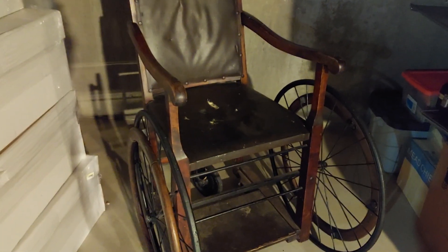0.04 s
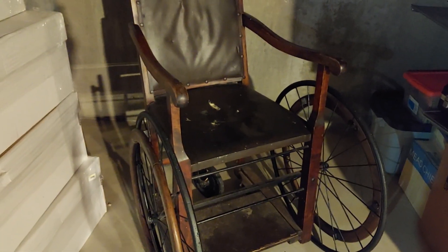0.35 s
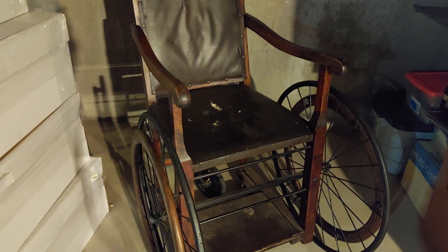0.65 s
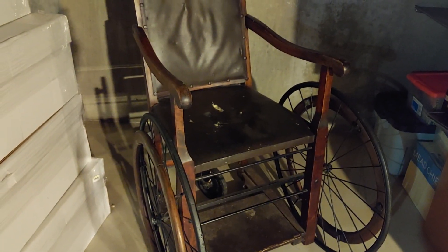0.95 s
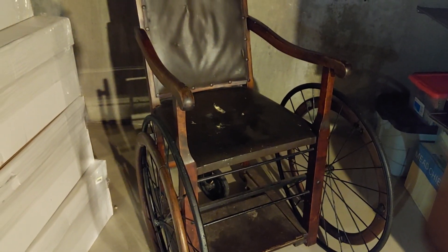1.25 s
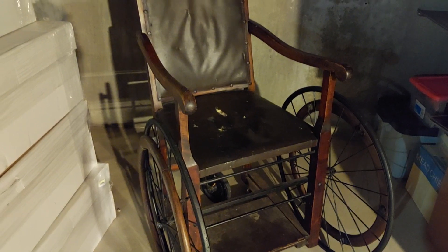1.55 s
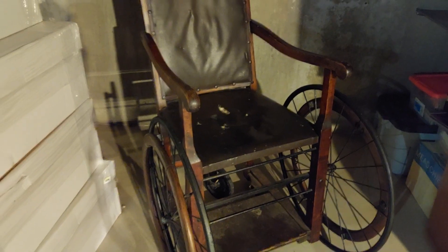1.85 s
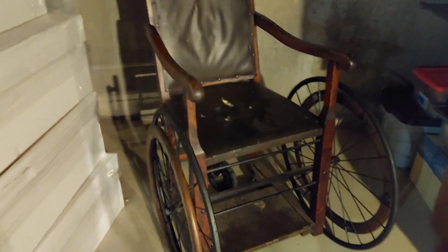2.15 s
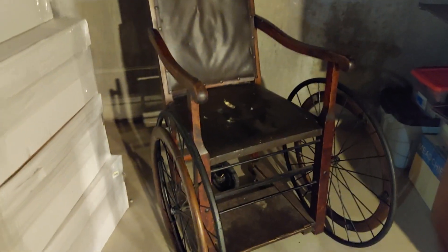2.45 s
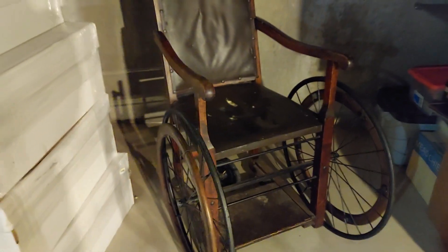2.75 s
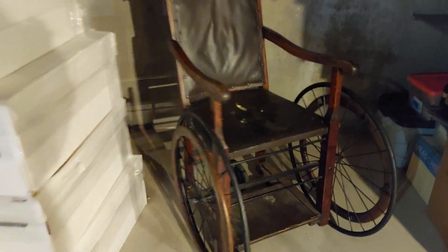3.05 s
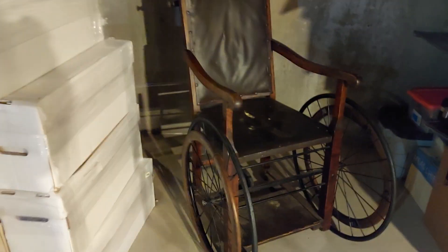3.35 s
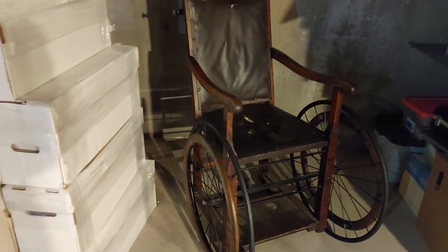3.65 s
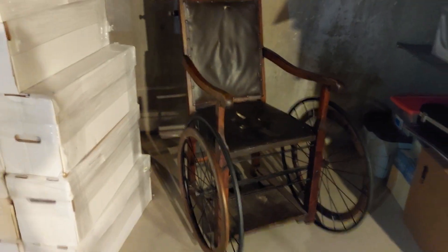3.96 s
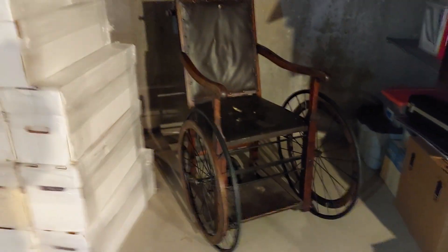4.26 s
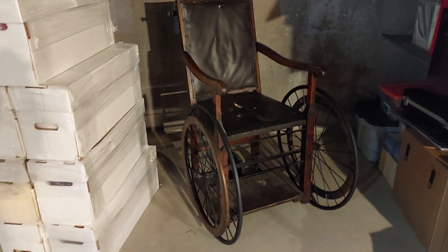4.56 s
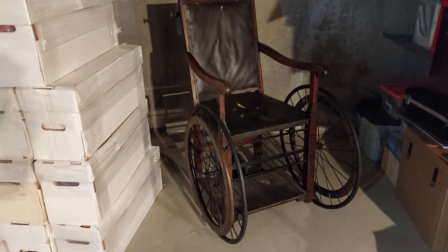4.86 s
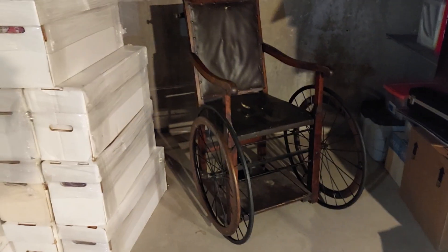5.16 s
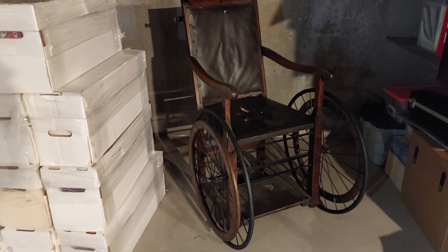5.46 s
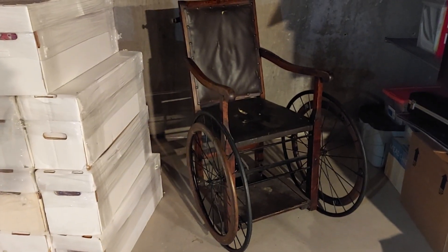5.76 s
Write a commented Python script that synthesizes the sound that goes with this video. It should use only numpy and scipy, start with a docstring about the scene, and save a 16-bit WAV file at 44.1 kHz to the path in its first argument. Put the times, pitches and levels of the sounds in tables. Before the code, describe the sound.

Low, continuous ventilation hum and duct rumble fill a small storage room, with a light air hiss and the faint buzz of a lamp above them. The hum swells gently from about halfway as the microphone is carried nearer the vent. Two short, dull handling knocks land close together on the right side, then the room tone carries on, with a few barely audible swishes of cloth.

```python
"""A deep hum and a soft rumble fill a quiet storage room, with a hiss of air and a faint buzz.
A ventilation fan makes the hum, air churning in its duct makes the rumble, and a lamp buzzes.
We listen from a hand-held camera carried slowly sideways towards the vent, so fan and air grow louder.
A finger knocks twice on the camera beside the right microphone, and a sleeve brushes now and then."""
import sys
import numpy as np
from scipy import signal
from scipy.fft import rfft, irfft
from scipy.io import wavfile

SR = 44100
rng = np.random.default_rng(int(sys.argv[2]) if len(sys.argv) > 2 else 0)


def unload_wav(signal):
    """Save mono or channel-first audio to the path in sys.argv[1] as 16-bit WAV at rate SR, clipped to [-1, 1]."""
    wavfile.write(
        sys.argv[1],
        SR,
        np.round(np.clip(np.atleast_2d(signal).T, -1, 1) * 32767).astype(np.int16),
    )


N = 256662
TIME, BINS_HZ = np.arange(N) / SR, np.fft.rfftfreq(N, 1 / SR)
FAN_HZ, MAINS_HZ, CUTOFF_HZ = 57.78, 60.02, 15750
SIDES = np.array([[1], [-1]])   # left up, right down: a "lean" is left minus right, in dB


def fan(wander_hz=0.039, waver_db=0.34, lean_db=2.5, centring_db=1.5):
    """The spinning shaft hums deeply, growing in surges; the motor adds a magnetic hum."""
    # Each row: time in seconds, level of the deep hum in dB.
    hum_levels = [(0, -40), (2.0, -40.5), (2.7, -39.5), (3.0, -37.5), (3.33, -35.5), (3.6, -35.5),
                  (4.2, -34.8), (4.44, -33.4), (4.65, -34), (5.07, -35.5), (5.23, -32.5), (5.42, -34),
                  (5.65, -32.5), (5.82, -33.4)]
    # Overtones of the shaft, then of the mains in the motor. Rows are as in standing_tones.
    shaft_tones = [(6, -59, 1, 0.51, 0.048, 6), (7, -69.5, -6, 0.93, 0.15, 9.5),
                   (8, -73.5, -5, 0.83, 0.04, 1)]
    motor_tones = [(2, -60.5, .5, .85, 0.1, 6), (4, -64, -7, 0.89, 0.018, 6)]
    turns = np.cumsum(FAN_HZ + wander_hz * drift(rate_hz=1.45)) / SR
    hum_db = in_time(hum_levels)[0] + waver_db * drift(rate_hz=6.0)
    pan_db = (lean_db - centring_db * walked()) / 2 * SIDES   # from the left towards the middle
    hum = from_db(hum_db + pan_db) * tone(turns)
    overtones = standing_tones(turns, shaft_tones, waver_db=1.3)
    motor = standing_tones(MAINS_HZ * TIME, motor_tones, waver_db=-4.5)
    return hum + overtones + motor


def standing_tones(turns, rows, waver_db):
    """Each tone wavers, and swells as we pass the spot where its echoes add up (a standing wave)."""
    way, out = walked(), 0
    # Each row: multiple of the base pitch, level in dB, lean in dB, loudest spot and its width
    # (both as shares of the walk), boost at that spot in dB.
    for multiple, level_db, lean_db, spot, width, boost_db in rows:
        swell_db = boost_db * bell(way, spot, width) + waver_db * drift(rate_hz=5.9)
        out = out + from_db(level_db + swell_db + lean_db / 2 * SIDES) * tone(turns, round(multiple))
    return out


def rumble(pan_db=-0.55, flutter_db=0.53):
    """Air churns in the duct, louder at the pitches where the room and the duct ring."""
    # The plain rumble. Each row: frequency in Hz, level in dB.
    colour = [(20, -80), (35, -81), (46, -82), (66, -65), (105, -68), (170, -71.5), (290, -77),
              (400, -74.5), (520, -80), (800, -82), (1400, -90.5), (2200, -97), (3000, -112), (6000, -135)]
    # Where it rings. Each row: frequency in Hz, width in Hz, boost in dB, lean in dB.
    resonances = [(73.8, 14.6, 4.5, 5), (131.6, 24.5, 4.5, 1), (156.7, 9.8, 8, 2), (187.2, 18, 6, 2),
                  (244.3, 37, 8.5, -1), (310, 21, 7, 1), (362.4, 45, 4.5, 4.5), (469.5, 38, 5, 0.5),
                  (579.5, 38, 4.5, -0.5), (700, 22, 4.5, 1.5), (842, 16, 2.5, -0.5)]
    density_db = at_hz(colour, BINS_HZ) + pan_db * SIDES
    for hz, width_hz, boost_db, lean_db in resonances:
        density_db += bell(BINS_HZ, hz, width_hz / 2) * (boost_db + lean_db / 2 * SIDES)
    return diffuse_noise(density_db) * from_db(flutter_db * drift(rate_hz=19.0))


def hiss(coarse_db, fine_db, split_hz=6000, flutter_db=0.5):
    """Air hisses at the vent; its lower, coarse part and its higher, fine part each have a gain."""
    # Each row: frequency in Hz, left level in dB, right level in dB.
    colour = [(500, -110, -104), (1470, -103, -93), (2360, -104, -96), (2690, -108.5, -97.5),
              (3370, -107.5, -96.5), (3940, -112.5, -99), (4940, -112, -100.5), (5700, -117, -108),
              (6500, -116.5, -113), (7600, -117, -120), (8400, -116, -125), (9500, -114, -122.5),
              (10500, -119.5, -123), (11400, -117.5, -119.5), (12200, -120, -122), (14100, -118, -122.5),
              (15400, -120, -125)]
    noise = shifting_colour(diffuse_noise(at_hz(colour, BINS_HZ)), depth_db=2.1, band_hz=319)
    coarse = irfft(rfft(noise) / (1 + (BINS_HZ / split_hz) ** 8), N)
    air = from_db(coarse_db) * coarse + from_db(fine_db) * (noise - coarse)
    return air * from_db(flutter_db * drift(rate_hz=9.3))


def shifting_colour(x, depth_db, band_hz, count=7):
    """Neighbouring bands rise and fall on their own, as echoes do at a moving microphone."""
    spectrum, out = rfft(x), 0
    for k in range(count):
        bands_away = np.abs((BINS_HZ / band_hz - k + count / 2) % count - count / 2)
        bands = irfft(spectrum * np.clip(1 - bands_away, 0, 1), N)
        out = out + bands * from_db(depth_db * drift(rate_hz=4.0))
    return out


def swells():
    """Now and then the air noise gathers in one narrow band and rings softly."""
    # Each row: peak time and spread in seconds, pitch and width in Hz, level in dB, lean in dB.
    bands = [(0.2, 0.083, 726, 130, -78.5, 0), (0.2, .07, 235, 19, -63, 0), (0.45, .16, 154, 25, -62.5, 0),
             (1.15, 0.15, 3360, 240, -101, -9), (2.057, 0.16, 242, 17.5, -62, 1),
             (2.5, 0.13, 2300, 120, -98, -6), (2.9, 0.5, 3480, 260, -103, -6),
             (3.063, 0.091, 357, 35, -63, 0), (3.34, 0.17, 130, 28, -58, 0),
             (3.4, 0.093, 2300, 54, -86.5, -6), (3.828, 0.072, 153.5, 18, -58, 1),
             (4.318, 0.073, 258, 29, -63, -3), (4.95, 0.57, 120.4, 21, -61.5, -2),
             (5.427, 0.13, 249, 22, -59.5, -1), (5.6, 0.36, 1930, 400, -97, -10)]
    out = 0
    for peak_s, spread_s, hz, width_hz, level_db, lean_db in bands:
        band_db = -20 * np.log10(1 + (2 * (BINS_HZ - hz) / width_hz) ** 4)
        noise = diffuse_noise(level_db + band_db + lean_db / 2 * SIDES)
        out = out + noise * bell(TIME, peak_s, spread_s)
    return out


def knocks(snap_db=13.5, press_db=28, press_lead_s=0.00046, far_side_db=-26):
    """A finger's dull press, sharp snap and short rebound pass through the shell to the right side."""
    # Contacts, bunched into two knocks. Each row: time in seconds, strength in dB, extra push in dB.
    touches = [(3.99487, -29.5, 1), (3.99548, -33.5, -4), (4.08345, -37.5, 5.5), (4.08545, -28, -4),
               (4.0894, -23.3, 1.5)]
    # How the camera's shell rings. Each row: pitch in Hz, level in dB, seconds to fade by 60 dB.
    shell = [(215, -8, 0.022), (420, -11, 0.0047), (766, -13, 0.0021), (1530, -0.5, 0.003)]
    snaps, pushes = np.zeros((2, N))
    for start_s, strength_db, push_db in touches:
        snaps[round(start_s * SR)] += from_db(strength_db + snap_db)
        pushes[round(start_s * SR)] += from_db(strength_db + push_db)
    snap = low_pass(snaps, hz=2500, order=1)
    push = low_pass(pushes, hz=1600, order=2)   # the fingertip gives, so the rebound follows the snap
    rebound = sum(from_db(level_db) * ring(push, hz, t60) for hz, level_db, t60 in shell)
    early_pushes = np.roll(pushes, -round(press_lead_s * SR))   # the pad of the finger lands first
    press = from_db(press_db) * low_pass(early_pushes, hz=600, order=2)
    return low_pass(rebound - snap - press, hz=6200, order=7) * from_db([[far_side_db], [0]])


def lamp(places=44, near_echo=0.4, echo_delay_s=(0.00041, 0.002)):
    """The lamp buzzes twice per mains cycle; echoes differ from place to place, so it shimmers."""
    # The buzz's overtones. Each row: frequency in Hz, left level in dB, right level in dB.
    colour = [(3100, -105, -101), (4050, -103, -88), (4770, -96, -91), (5170, -102, -91),
              (5970, -111, -102), (7700, -107, -113), (8200, -100, -112), (9200, -92, -106),
              (10030, -93, -105), (10540, -102, -107), (11500, -95.5, -100), (12400, -102, -107),
              (12600, -99, -103), (13200, -100, -107), (14400, -95, -107), (15300, -107, -119)]
    # Each row: time in seconds, gain of the buzz in dB.
    loudness = [(0, 4), (1.1, -0.5), (1.85, -0.5), (2.3, 1), (3.0, 5.5), (5.0, 1), (5.82, 6)]
    # Overtones of the mains that stand out as a thin whine. Rows are as in standing_tones.
    whine = [(78, -97, -12, .1, .2, 5), (80, -95, -12, .85, .08, 7), (82, -94, -12, .045, .05, 9),
             (142, -102.5, 20, .072, .021, 11.5), (154, -101, 14, 1, .035, 12),
             (158, -103, 14, .068, .016, 9), (160, -102, 14, .073, .013, 10.5),
             (166, -102, 14, .04, .014, 7), (192, -103.5, 12, .06, .016, 8), (242, -106, 14, .86, .04, 12)]
    multiples = 2 * np.arange(2049)
    overtones_hz = MAINS_HZ * multiples
    in_range = (overtones_hz > colour[0][0]) & (overtones_hz < CUTOFF_HZ)
    whining = np.isin(multiples, [row[0] for row in whine])
    strength = from_db(at_hz(colour, overtones_hz)) * (in_range & ~whining)
    places_passed = (places - 1) * walked()
    phase = 2 * MAINS_HZ * TIME % 1
    buzz = np.zeros((2, N))
    for place in range(places):
        echoes = rng.standard_normal(strength.shape) + 1j * rng.standard_normal(strength.shape)
        # one echo from close by groups the overtones into bands
        reflection = near_echo * np.exp(-2j * np.pi * overtones_hz * rng.uniform(*echo_delay_s))
        bands = (1 + reflection) / np.hypot(1, near_echo)
        cycles = irfft(strength * echoes * bands) * (len(overtones_hz) - 1)   # one for each side
        grid = np.linspace(0, 1, cycles.shape[1], endpoint=False)
        near = np.abs(places_passed - place) < 1
        fade = np.cos(np.pi / 2 * (places_passed[near] - place))
        buzz[:, near] += fade * [np.interp(phase[near], grid, cycle) for cycle in cycles]
    return from_db(in_time(loudness)) * buzz + standing_tones(MAINS_HZ * TIME, whine, waver_db=1.5)


def sleeve():
    """Cloth slides in short, soft swishes."""
    # Each row: peak time in seconds, spread in seconds, gain in dB.
    brushes = [(2.145, .01, -3), (2.99, .035, -5), (4.03, 0.044, -4), (4.416, 0.17, -3), (4.893, .021, 2)]
    # The rubbing noise. Each row: frequency in Hz, left level in dB, right level in dB.
    cloth = [(2000, -125, -120), (4500, -113, -102), (6800, -113, -106), (9000, -110, -119),
             (13000, -111, -119), (16000, -117, -124)]
    strokes = sum(from_db(db) * bell(TIME, peak_s, spread_s) for peak_s, spread_s, db in brushes)
    return strokes * diffuse_noise(at_hz(cloth, BINS_HZ))


def diffuse_noise(density_db, lag_s=.00033, lag_from_hz=600):
    """Noise from all around, in dB per Hz: alike on both sides in the bass, unrelated in the treble."""
    # Each row: frequency in Hz, how alike the two microphones are (1 means the same).
    likeness = [(60, 0.85), (130, 0.98), (290, 0.85), (640, 0.35), (1000, 0.66), (1410, 0.45),
                (3100, 0.071), (6800, 0.063)]
    mid, side = rfft(rng.standard_normal((2, N)))
    alike = np.clip(at_hz(likeness, BINS_HZ), -1, 1)
    pair = np.sqrt(1 + alike) * mid + np.sqrt(1 - alike) * side * SIDES
    # higher sounds reach the right microphone first
    left_delay_s = lag_s * (1 - np.exp(-(BINS_HZ / lag_from_hz) ** 2))
    pair[0] *= np.exp(-2j * np.pi * BINS_HZ * left_delay_s)
    return irfft(pair * from_db(density_db), N) * np.sqrt(SR) / 2


def walked():
    """How far along the camera is at every sample: it lingers, steps sideways, then slows."""
    # Each row: time in seconds, share of the walk from 0 to 1.
    path = [(0, 0.086), (2.0, 0.02), (2.7, 0.17), (3.1, 0.59), (4.3, 0.83), (5.82, 1)]
    return np.clip(in_time(path)[0], 0, 1)


def from_db(db):
    """Turns decibels into a gain."""
    return 10 ** (np.asarray(db) / 20)


def bell(x, centre, spread):
    """A smooth bump of height 1."""
    return np.exp(-.5 * ((x - centre) / spread) ** 2)


def in_time(rows):
    """Joins a table's points with straight lines, giving values at every sample."""
    seconds, *columns = np.transpose(rows)
    return np.array([np.interp(TIME, seconds, c) for c in columns])


def at_hz(rows, hz):
    """Reads a table at the given frequencies, with octaves evenly spaced."""
    points, *columns = np.transpose(rows)
    return np.array([np.interp(np.log(hz + 1e-9), np.log(points), c) for c in columns])


def drift(rate_hz):
    """Slow random wandering with a spread of 1."""
    slow = irfft(rfft(rng.standard_normal(N)) / (1 + (BINS_HZ / rate_hz) ** 2) ** 2, N)
    return (slow - slow.mean()) / slow.std()


def tone(turns, multiple=1):
    """A pure tone of power 1 at a multiple of a rotation; it starts anywhere in its cycle."""
    return np.sqrt(2) * np.sin(2 * np.pi * (multiple * turns + rng.random()))


def ring(clicks, hz, t60):
    """Each click starts a tone that fades by 60 dB in t60 seconds."""
    decay, angle = from_db(-60 / (t60 * SR)), 2 * np.pi * hz / SR
    return signal.lfilter([0, np.sin(angle)], [1, -2 * decay * np.cos(angle), decay ** 2], clicks + 1e-18)


def low_pass(x, hz, order):
    """Softens the sound above hz; a higher order cuts more steeply."""
    return signal.sosfilt(signal.butter(order, min(hz, .45 * SR), fs=SR, output="sos"), x + 1e-18)


def scene():
    """Fan, air and lamp fill the room; the air grows louder towards the vent, its fine hiss most."""
    way = walked()
    duct = from_db(-0.74 + 1.5 * way) * rumble()
    air = hiss(coarse_db=-0.58 + 3 * way, fine_db=-1.5 + 5.5 * way)
    return fan() + duct + air + swells() + lamp() + knocks() + sleeve()


def record(dry):
    """The highest treble is cut off steeply."""
    return signal.sosfilt(signal.ellip(10, .1, 70, CUTOFF_HZ, fs=SR, output="sos"), dry)


dry = scene()
out = record(dry)
unload_wav(out)
```